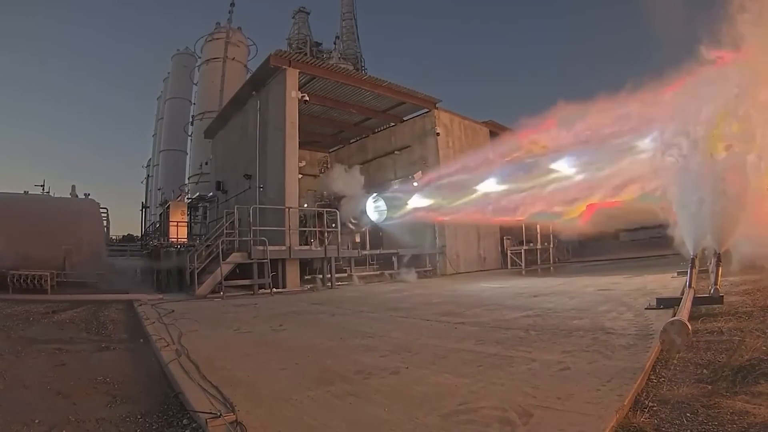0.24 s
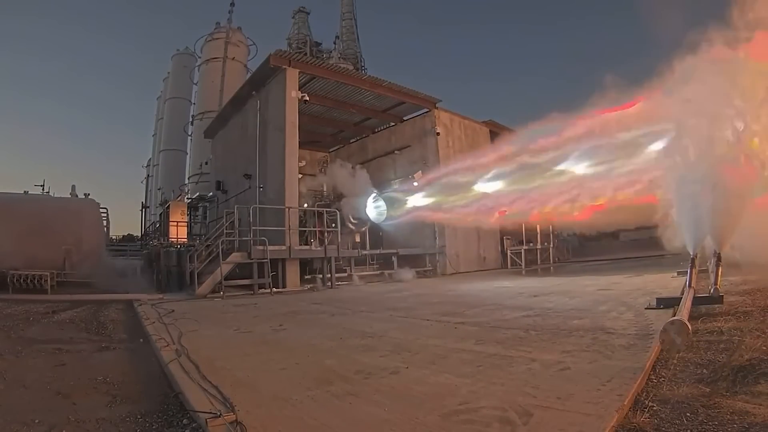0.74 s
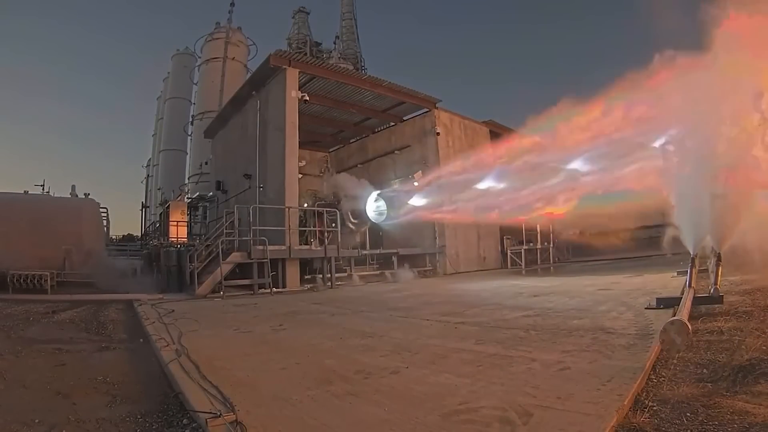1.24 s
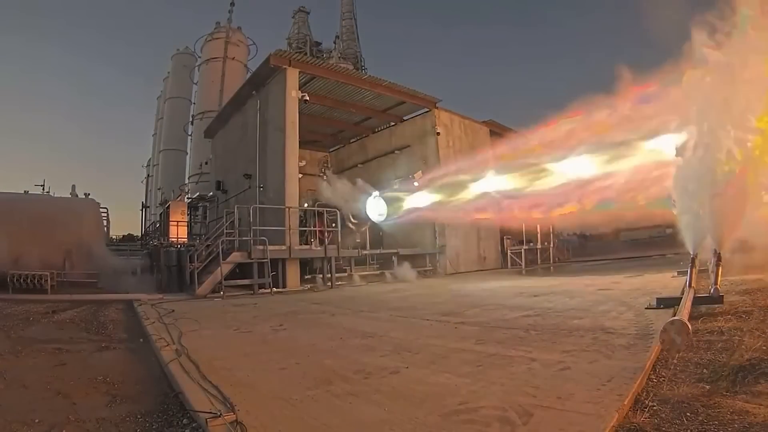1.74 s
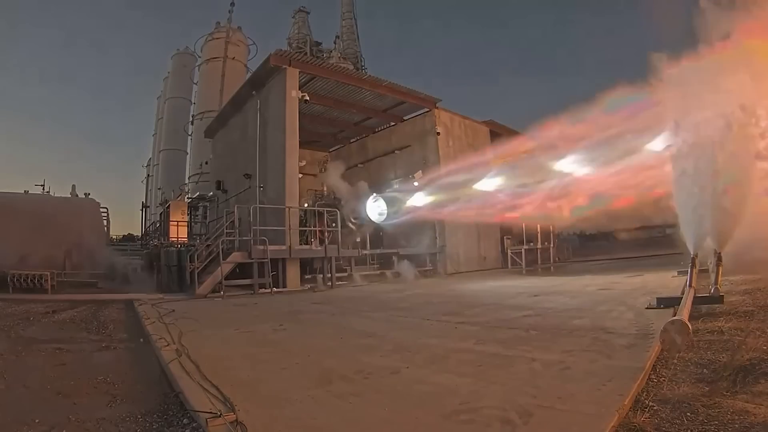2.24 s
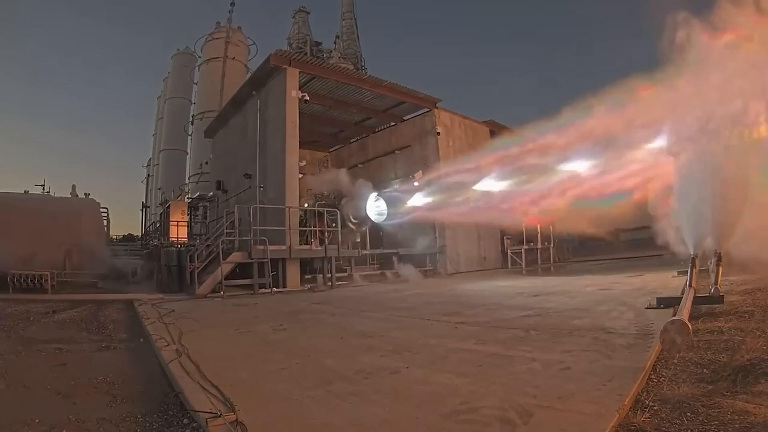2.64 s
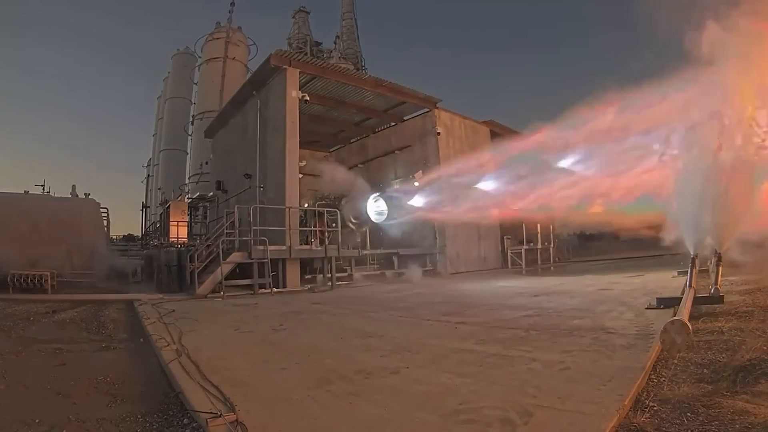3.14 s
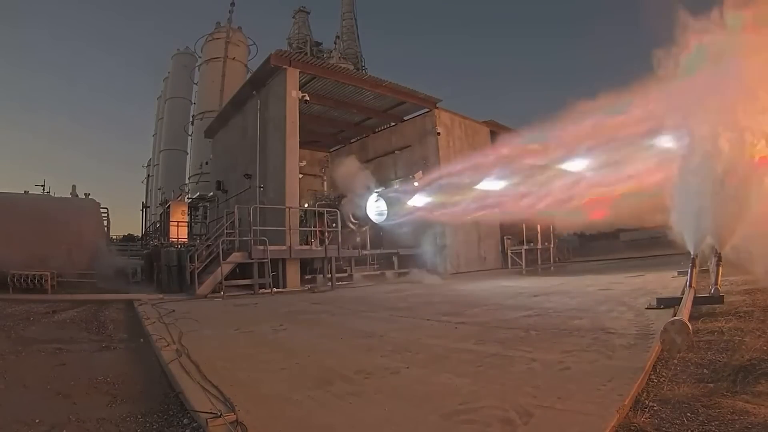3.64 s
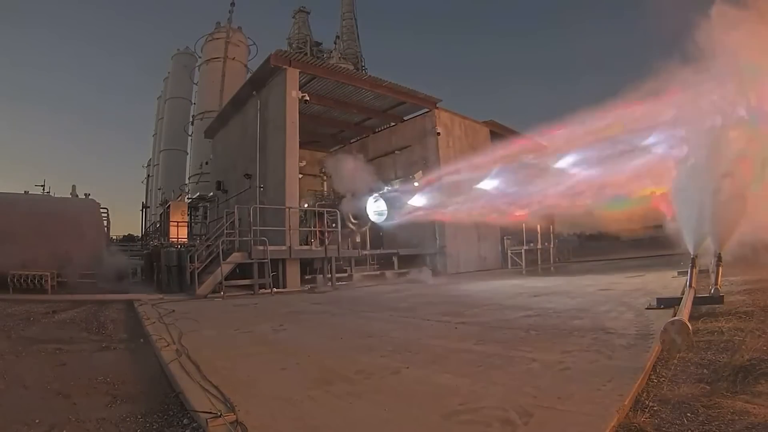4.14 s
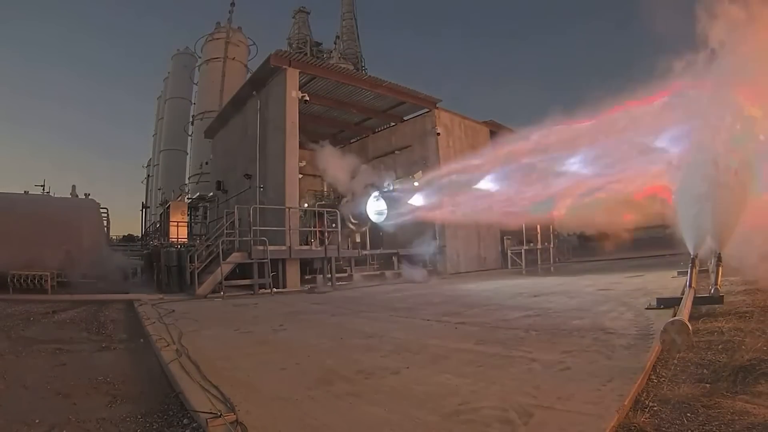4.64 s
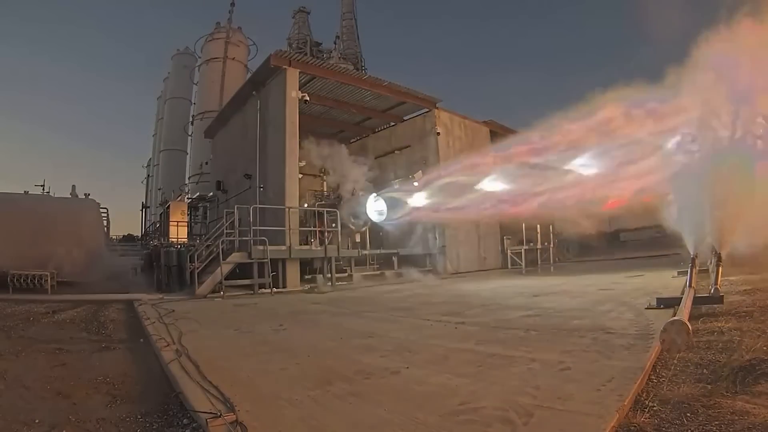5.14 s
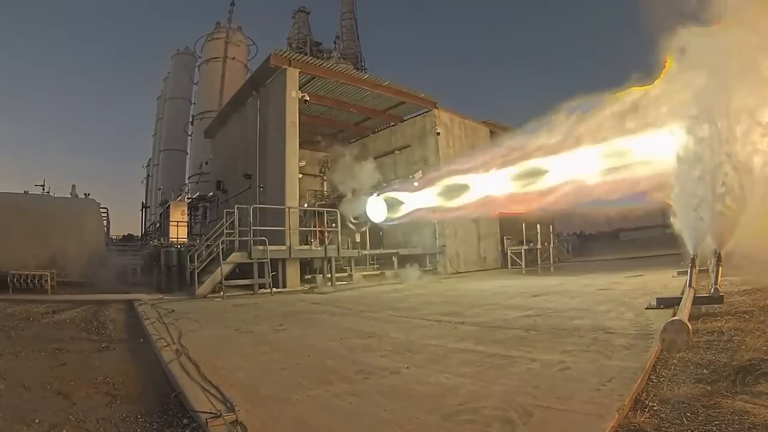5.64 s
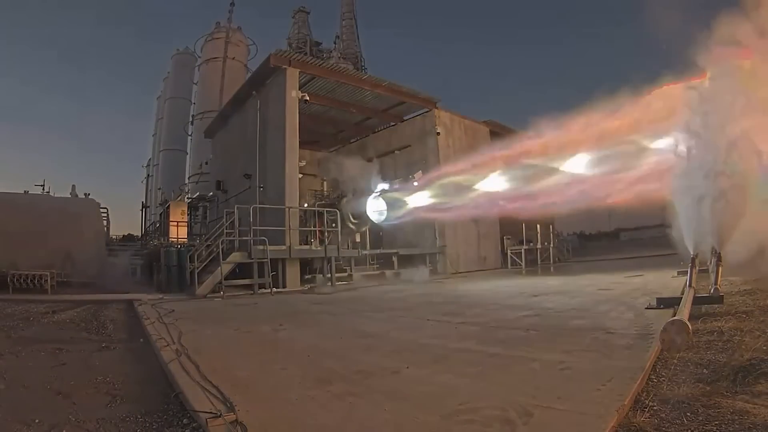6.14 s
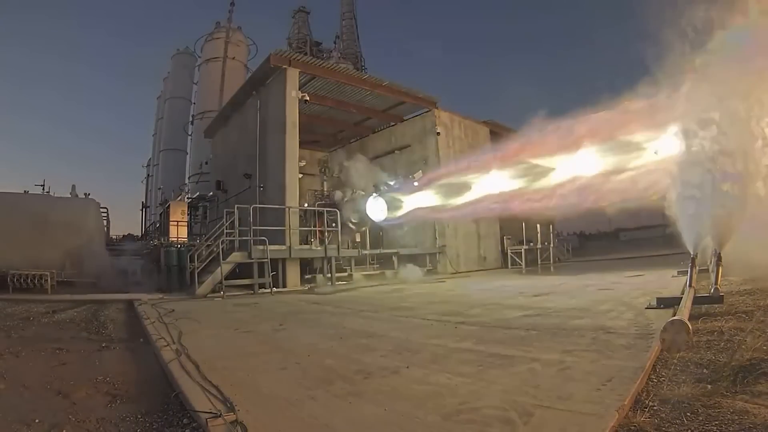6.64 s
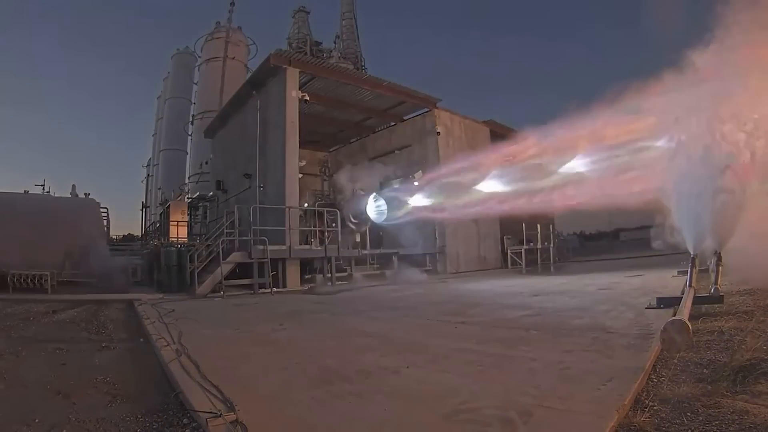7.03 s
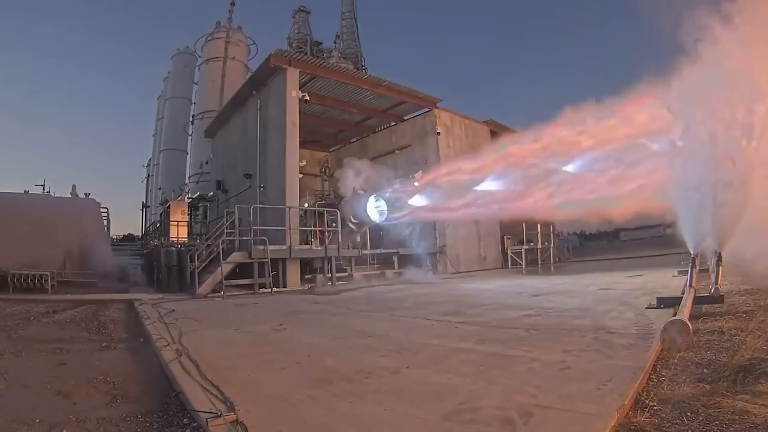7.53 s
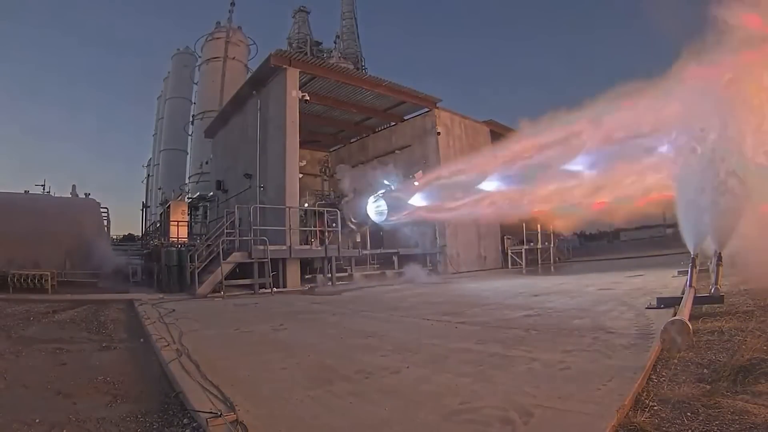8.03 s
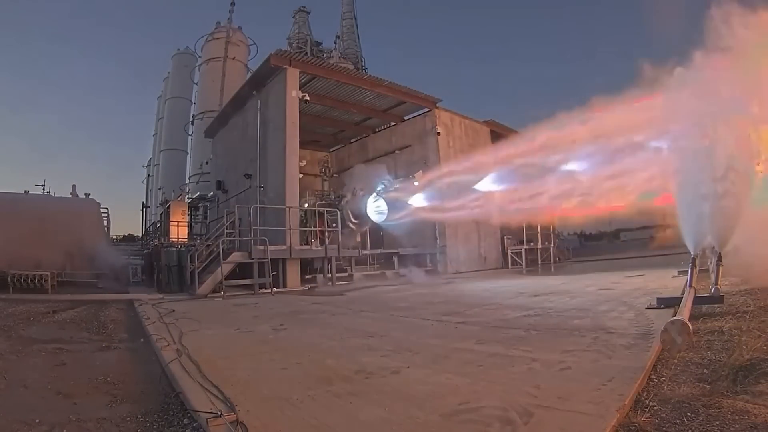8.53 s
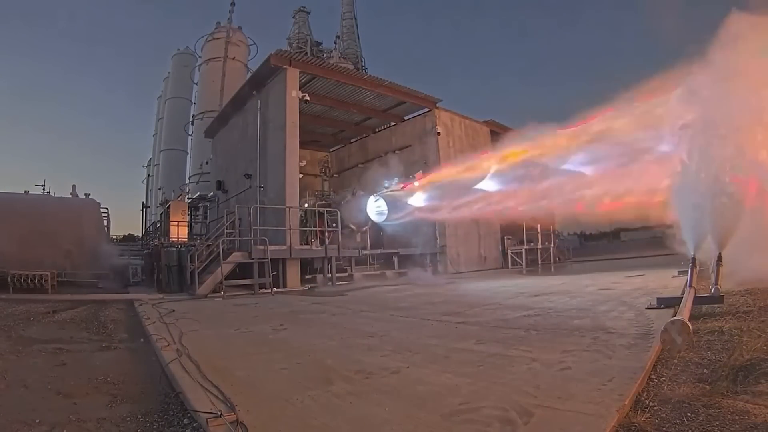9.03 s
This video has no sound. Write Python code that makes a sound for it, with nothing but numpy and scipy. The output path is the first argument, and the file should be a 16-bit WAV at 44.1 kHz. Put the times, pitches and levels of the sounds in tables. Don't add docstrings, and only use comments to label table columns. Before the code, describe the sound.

A rocket engine on an outdoor test stand fires continuously, a very loud deep roar with heavy rumble and dense, sharp, irregular crackling throughout.

```python
import sys
import numpy as np
from scipy import signal
from scipy.fft import rfft, irfft
from scipy.io import wavfile
from scipy.ndimage import uniform_filter1d

SR = 44100
rng = np.random.default_rng(int(sys.argv[2]) if len(sys.argv) > 2 else 0)


def volts_from_db(level):
    exponent = np.asarray(level, float) / 20
    return 10 ** exponent


def unload_audio(sound):
    columns = np.transpose(np.atleast_2d(sound))
    steps = np.round(np.clip(columns, -1, 1) * 32767)
    wavfile.write(sys.argv[1], SR, steps.astype(np.int16))


N = 409248

# time in seconds, change in dB, half width in seconds.
SURGES = [(.01, 3, .03), (.2, 4, 0.088), (.85, -6, 0.09644), (1.06, 2, .06), (3.69, -5, .04),
          (3.77, 3, .03), (3.93, 1.5, .08), (4.47, -5, .04), (4.63, 2.5, 0.056), (4.73, -4, .04),
          (4.85, 3, .04), (4.91, -5, 0.02892), (5.25, 2, 0.075), (5.89, 2.5, .07), (6.1, -3.5, .07),
          (6.35, -5, .06), (6.97, -3, 0.065), (7.19, -2, 0.054), (7.39, 2, .06), (7.49, -10.5, .04)]
# delay in ms, ring level in dB, front level in dB.
DIRECT = [
    (0, 1, -0.5),
    (1.15, -1.5, -10.5),
]
# delay in ms, ring level in dB, front level in dB.
GROUND = [
    (4.45, -2, 0),
    (5.7, -5, -14),
    (9.1, -9.5, -20),
    (14.5, -11, -21),
]


def evened(x):
    return x / np.sqrt(np.mean(x ** 2) + 1e-20)


def read(points, hz):
    f, value = np.transpose(points)
    return np.interp(np.log(hz + 1), np.log(f + 1), value)


def shaped(x, db_of_hz):
    return irfft(rfft(x) * volts_from_db(db_of_hz(np.fft.rfftfreq(N, 1 / SR))), N)


def wander(hz):
    return evened(signal.lfilter(*signal.butter(2, hz, fs=SR), rng.standard_normal(N)))


def bumps(rows):
    t = np.arange(0, N + 64, 64) / SR
    bells = sum(db * np.exp(-((t - s) / width) ** 2) for s, db, width in rows)
    return np.interp(np.arange(N) / SR, t, bells)


def plume(column):
    # time in seconds, crackle activity in dB, lean of small fronts to the direct path in dB.
    plume_rows = np.array([(0, -57, -1.5), (.2, -52, 0), (.6, -55, 1), (.78, -63.5, -2), (1.05, -54, 0),
                           (1.6, -56.5, -4), (2.2, -52.5, -4), (3.3, -54, -5), (3.65, -58, -5),
                           (3.8, -53, -5), (4.25, -52, -6), (4.45, -56, -6), (5.4, -55.5, -6.5),
                           (5.85, -51, -4), (6.05, -54.5, -3), (7.5, -58.5, 3), (8.2, -54, -0.5),
                           (9.28, -58, -3)])
    return np.interp(np.arange(N) / SR, plume_rows[:, 0], plume_rows[:, column])


def rumble(level_db=-11.5, steadiness=0.43):
    # frequency in Hz, strength in dB per Hz.
    rumble_colour = [(14, -35), (24, -11), (43, -1.6158), (65, -1.5), (80, -1), (110, -14), (130, -12.5),
                     (170, -42), (290, -120)]
    deep = evened(shaped(rng.standard_normal(N), lambda hz: read(rumble_colour, hz)))
    swell = uniform_filter1d(np.abs(signal.hilbert(deep)), size=1500) + 0.1
    deep = evened(shaped(deep / swell ** steadiness, lambda hz: -10 * np.log10(1 + (hz / 100) ** 6)))
    deep = volts_from_db(level_db + bumps(SURGES)) * deep
    return np.array([deep, np.roll(deep, SR // 8)])


def turbulence(spectrum, level_db, flicker_db, flicker_hz):
    noise = [evened(shaped(rng.standard_normal(N), lambda hz: read(spectrum, hz))) for _ in range(2)]
    return np.array(noise) * volts_from_db(level_db + flicker_db * wander(flicker_hz))


def body():
    # frequency in Hz, strength in dB per Hz.
    body_colour = [(65, -36), (110, -2), (151, -3), (204, 0), (298, -1), (388, -13), (420, -15), (550, -40),
                   (920, -120)]
    # time in seconds, change in dB, half width in seconds.
    body_swells = [
        (3.7, 1, 0.0794),
        (5.0, -2, .13),
        (6.26, 2, 0.13),
        (7.68, -3, .13),
        (8.35, -1, .15),
        (.1, -1, 0.081),
        (5.95, -2.5, 0.091),
        (8.15, 1.5, 0.089),
    ]
    level_db = -18.5 + 0.2 * bumps(SURGES) + bumps(body_swells)
    return turbulence(body_colour, level_db, flicker_db=1.5, flicker_hz=25)


def roar_db():
    calm_db = -55.5
    return -23 + 0.18 * (plume(column=1) - calm_db)


def roar():
    # frequency in Hz, strength in dB per Hz.
    roar_colour = [(240, -32), (400, -8.5), (537, -4), (630, -2.5), (776, -1), (930, -1.5), (1090, -11.5),
                   (1300, -10.5), (1560, -14), (3590, -29), (5800, -51), (7500, -47.5), (9750, -62),
                   (12200, -66), (16500, -120)]
    return turbulence(roar_colour, roar_db(), flicker_db=1.52, flicker_hz=50)


def front(edge_hz=6000):
    # frequency in Hz, level in dB.
    front_colour = [(700, -16), (1400, 1.5), (2200, 2.5), (4200, -2), (6000, -14), (7000, -6), (9000, -5),
                    (10200, -5), (11300, -9), (12300, -21), (13300, -47), (15000, -59)]
    hz = np.abs(np.fft.fftfreq(4096, 1 / SR))
    log_gain = np.log(volts_from_db(np.maximum(read(front_colour, hz), -70)))
    whole = np.exp(log_gain - 1j * np.imag(signal.hilbert(log_gain)))
    jump = np.fft.ifft(whole).real[:2048]
    edge = signal.lfilter(*signal.butter(6, edge_hz, "high", fs=SR), jump)
    low = signal.lfilter(*signal.butter(6, edge_hz, fs=SR), jump)
    return np.array([low, -edge]) / np.abs(jump).max()


def ring(hz, db, t60, delay_ms=0, rise_ms=0.076414):
    t = np.maximum(np.arange(2048) / SR - delay_ms / 1000, 0)
    rise = 1 - np.exp(-(t * 1000 / rise_ms) ** 2)
    return volts_from_db(db - 60 * t / t60) * np.sin(2 * np.pi * hz * t) * rise


def housing():
    # frequency in Hz, level in dB, t60 in seconds.
    modes = [
        (885, -1, .008),
        (685.77, -7, 0.007046),
        (1560, -7, .007),
        (2090, -14.5, 0.0022),
    ]
    return sum(ring(*mode) for mode in modes)


def ground_thump():
    # frequency in Hz, level in dB, t60 in seconds, delay in ms.
    bounce = (250, -4, 0.0008, 3)
    return ring(*bounce)


def stand_tail(clicks, t60):
    r = np.exp(-2 * np.log(1000) / (t60 * SR))
    power = signal.lfilter([1 - r], [1, -r], clicks ** 2)
    return np.sqrt(power) * rng.standard_normal(size=(2, N))


def add_knocks(rings, lag):
    # time in seconds, ring level in dB.
    knocks = [(0.0589, -12.5), (0.1828, -9.5), (0.2096, -4), (0.2759, -6.5), (0.3083, -9), (0.3506, -12.5),
              (0.5764, -11.5), (0.596, -8), (1.006, -12), (1.0195, -10), (1.0579, -12), (1.5294, -9),
              (1.6642, -13), (1.817, -9), (1.8708, -8), (1.9275, -10), (1.9373, -11), (2.2335, -9),
              (2.304, -13), (2.3865, -5), (2.4072, -11), (2.6118, -10), (3.0335, -11.5), (3.2278, -10),
              (3.3274, -6), (3.401, -10.5), (3.4576, -9), (3.4877, -14), (3.5036, -10), (3.7198, -10),
              (3.9025, -8), (3.9194, -8), (3.9886, -8), (4.0239, -10), (4.1864, -10), (4.2075, -8),
              (4.2179, -5), (4.2358, -9), (4.2759, -9), (4.3104, -12), (4.416, -10.5), (4.4445, -10),
              (4.5326, -11), (4.6805, -8), (4.7085, -10), (4.9912, -9), (5.0336, -8), (5.2403, -8),
              (5.269, -10), (5.4659, -10.5), (5.4757, -7.5), (5.5735, -10), (5.7641, -9), (6.2906, -9),
              (6.4278, -10.5), (6.503, -6), (6.5383, -7), (6.6809, -14), (6.8475, -8), (7.3562, -7)]
    s, db = np.transpose(knocks)
    at = np.round(s * SR).astype(int)
    rings[at] = volts_from_db(db)
    rings[at + lag] = volts_from_db(db - 5.5)


def lone_shocks():
    # time in seconds, body level in dB, edge
    # level in dB.
    lone_clicks = [(0.0718, -30, -44.0), (0.1052, -29.5, -47.5), (0.1498, -31.0, -33.0), (0.1854, -27.0, -33.0),
                   (0.1982, -22, -35.0), (0.203, -48, -36.5), (0.2229, -27, -41.5), (0.275, -30.0, -37.0),
                   (0.282, -28.5, -41.0), (0.2983, -32, -40.0), (0.3497, -28.0, -37), (0.3802, -25.5, -29),
                   (0.4062, -32.0, -42.0), (0.4329, -34, -38.5), (0.44, -27, -34), (0.5637, -31, -36.5),
                   (0.5755, -35.0, -39.0), (0.5873, -34.0, -37.0), (0.6075, -31, -33.0), (0.6764, -33, -43.0),
                   (0.8213, -29.0, -37), (1.0066, -41.0, -38.0), (1.2349, -29.5, -40.0), (1.339, -32, -37.0),
                   (1.4989, -28.5, -34.0), (1.5035, -36.0, -39.0), (1.5457, -37, -40.0), (1.7621, -32, -36.0),
                   (1.7876, -51.0, -32.5), (1.8426, -32.0, -41.0), (1.8715, -36, -40.0), (1.875, -32.0, -37.5),
                   (1.9287, -34.0, -37), (1.932, -27.5, -38.0), (1.9565, -31, -37), (2.007, -33.0, -41.5),
                   (2.0296, -29, -35.0), (2.0326, -31, -30), (2.071, -30, -38.0), (2.0745, -30.0, -32.5),
                   (2.1064, -31.0, -37.0), (2.1498, -32.0, -36), (2.1699, -25.5, -31.0), (2.2236, -29, -29),
                   (2.2306, -28.0, -30), (2.2342, -30.0, -34.5), (2.3613, -24.0, -27), (2.3715, -46.0, -33.0),
                   (2.3878, -27.0, -34.0), (2.4117, -33.0, -31.5), (2.4545, -30, -29), (2.5307, -34.5, -37.0),
                   (2.5462, -27, -33.0), (2.5546, -36.0, -42.0), (2.5814, -20, -34.5), (2.5856, -29.0, -33.0),
                   (2.6674, -31.0, -33.0), (2.6778, -32.0, -43.0), (2.741, -31.0, -33.5), (2.8158, -35, -31),
                   (2.8228, -29, -32), (2.8712, -34.5, -39.0), (2.8757, -32.0, -28), (3.0369, -31.5, -38.0),
              (3.1201, -36, -37), (3.1243, -31.5, -30), (3.1314, -28.0, -30.5), (3.2171, -27, -43.0),
              (3.2218, -36.0, -32.0), (3.2328, -32.0, -39.0), (3.3122, -37, -36), (3.3294, -29, -38.0),
              (3.3327, -24, -30.0), (3.401, -32.5, -45.0), (3.4139, -33.0, -39.0), (3.4484, -33, -29.0),
              (3.5037, -32, -39.0), (3.5082, -31.0, -43), (3.5621, -31, -31.0), (3.7114, -33, -39),
              (3.7199, -31, -44.0), (3.7474, -32.5, -33.0), (3.7736, -26.0, -31.0), (3.778, -24, -31),
              (3.787, -33.0, -29.0), (3.8241, -31.0, -44.0), (3.9023, -31.5, -31.0), (3.9072, -29, -30.5),
              (3.9242, -31.0, -35.0), (3.9718, -34, -36.0), (3.9764, -33.0, -35), (3.9933, -33.0, -33),
              (4.014, -32.0, -46.0), (4.0176, -31.0, -35), (4.024, -33.5, -38), (4.0723, -24, -37.0),
              (4.0768, -29.0, -29), (4.088, -30, -40.0), (4.119, -30, -34), (4.1548, -31, -33.0),
              (4.1871, -31.0, -32.5), (4.1919, -33.0, -28.0), (4.209, -33, -35), (4.219, -32.0, -35.0),
              (4.2367, -31.0, -32.5), (4.2411, -29.0, -32.0), (4.2772, -29, -35), (4.3115, -35.0, -41.0),
              (4.3153, -31.5, -35.5), (4.3418, -35, -44), (4.4126, -34.5, -35.0), (4.4463, -29.0, -36.0),
              (4.5927, -36, -38), (4.6723, -26, -35.0), (4.6771, -29.0, -33.0), (4.686, -25.0, -27.0),
              (4.7407, -27.5, -36.0), (4.9406, -28, -33.0), (4.977, -34, -31.5), (4.9957, -32, -30.0),
                   (5.1365, -30.5, -32.5), (5.1668, -31.0, -33.5), (5.2728, -32, -32.0), (5.3288, -36.0, -46.0),
            (5.541, -29.0, -37.0), (5.6054, -29.5, -27.0), (5.6573, -38.0, -43.0), (5.6906, -35.0, -48.0),
            (5.7913, -32, -40.0), (5.796, -26.5, -30), (5.9152, -30, -37.0), (6.1458, -33.0, -41.0),
            (6.171, -30.0, -34.0), (6.1746, -27.0, -30.0), (6.29, -31.0, -40.0), (6.2945, -36.0, -35.0),
            (6.3108, -29, -37), (6.4049, -29, -40.0), (6.4087, -31.5, -34), (6.5755, -33.0, -34),
            (6.5798, -35.0, -34.0), (6.7156, -33.0, -39.0), (6.756, -37.0, -40.0), (6.7839, -30, -38),
            (6.9235, -38.0, -31.5), (7.139, -29.0, -38.0), (7.1427, -33.0, -29), (7.168, -31.0, -25.0),
            (7.2717, -34.0, -34.0), (7.3097, -35.0, -33.5), (7.3479, -30.0, -36.0), (7.3569, -29.0, -39.0),
            (7.3611, -30.5, -33.0), (7.4338, -39.0, -40), (7.4378, -33.5, -35.5), (7.5772, -29.5, -30),
            (7.6485, -31, -36.0), (7.6526, -28, -32.5), (7.7924, -34, -36.0), (7.8, -31, -37.5),
            (7.805, -32, -32), (7.9404, -26.0, -42.0), (7.945, -32.0, -33.0), (8.0399, -50.0, -32.0),
            (8.1962, -31.0, -33), (8.225, -46.0, -33), (8.2527, -27, -35), (8.258, -31.5, -28),
            (8.367, -27, -35), (8.4626, -27, -37), (8.568, -35, -37), (8.6064, -38.0, -40.0),
            (8.611, -29.0, -34.0), (8.6413, -33, -41.0), (8.7173, -33.0, -32.0), (8.79, -26.0, -27.5),
            (8.8338, -30, -33), (9.0206, -29, -40.0), (9.026, -32, -33), (9.223, -29, -33.0),
                   (0.7865, -33.0, -41), (0.8616, -36.0, -46.0), (0.8945, -34.0, -47.0), (0.9368, -31.0, -45.0),
             (1.0989, -30, -41.0), (1.1948, -34.0, -42.0), (1.2071, -33.0, -41.0), (1.5422, -32, -41.0),
             (1.6103, -40.0, -45.0), (1.6138, -36.0, -39.0), (1.6214, -36.0, -41.0), (1.8469, -34, -37.0),
             (1.9051, -36, -43.0), (2.0812, -34, -36.0), (2.5652, -32, -39.0), (2.91, -36.5, -38.0),
             (2.9149, -31.0, -39.0), (3.0406, -36.0, -40.0), (3.2646, -31, -39.0), (3.4737, -35, -50.0),
             (3.7429, -35.0, -43.0), (3.955, -36.0, -39), (4.1255, -29, -37.0), (4.268, -22.0, -23.0),
             (4.385, -31, -33.0), (4.4036, -38.0, -42.0), (4.504, -35.0, -44.0), (4.5076, -35.0, -40.0),
             (4.5766, -28.0, -30), (4.6024, -33.0, -34), (4.895, -35.0, -44.0), (5.0483, -38.0, -48.0),
             (5.1637, -31.0, -41.0), (5.432, -38.0, -46.0), (5.5475, -31, -37.0), (6.0041, -39.0, -63.0),
             (6.1506, -32.0, -36.0), (6.2786, -36.0, -40.0), (6.3782, -33.0, -42.0), (6.4162, -40.0, -44.0),
             (6.5225, -38.0, -39), (6.6237, -33.0, -62.0), (6.7744, -35.0, -56.0), (7.0044, -36.0, -36.0),
             (7.0984, -35, -38.0), (7.1715, -36.0, -39), (7.2672, -35.0, -41.0), (7.6239, -41.0, -39.0),
             (8.1402, -32.0, -39), (8.8111, -46.0, -42), (8.8729, -36.0, -39), (8.945, -33.0, -38.0),
             (8.9807, -46.0, -35), (9.0602, -31, -53.0), (9.2536, -46.0, -44.0)]
    rings, fronts = np.zeros(N + SR), np.zeros((2, N + SR))
    lag = round(GROUND[0][0] / 1000 * SR)
    s, *db = np.transpose(lone_clicks)
    at, db = np.round(s * SR).astype(int), np.array(db)
    bright = db[1] > db[0] - 2
    first = at - lag * bright
    fronts[:, at - lag] = volts_from_db(db - 19)
    rings[first] = volts_from_db(db.max(0) + 13)
    fronts[:, at + round(DIRECT[1][0] / 1000 * SR)] = volts_from_db(db - 17)
    fronts[:, at] = volts_from_db(db - 1.5)
    add_knocks(rings, lag)
    return rings, fronts


def strong_shocks():
    # time in seconds, ring level in dB, front level in dB.
    sharp_late = [(2.1593, -3, -22.5), (2.3758, -5, -22), (2.4804, -10.5, -26), (2.6546, -9.5, -20),
                  (2.7599, -11.5, -23.5), (2.8983, -9, -21), (2.9646, -9, -25), (3.0218, -6, -25),
                  (3.1861, -12, -27), (3.3195, -10.5, -24), (3.762, -8.5, -21), (3.814, -6.5, -21),
                  (3.8728, -6.5, -22), (3.8915, -12, -27), (3.9548, -12, -28), (4.0447, -9, -20),
                  (4.175, -6.5, -25), (4.2666, -5.5, -19), (4.3837, -9, -28), (4.5577, -12.5, -27),
                  (4.607, -7.5, -27), (4.7181, -7.5, -27), (4.803, -8, -21), (4.8159, -6, -22),
                  (5.2015, -10, -25), (5.212, -8, -27), (5.2554, -9.5, -23.5), (5.3182, -8.5, -22),
                  (5.6447, -9.5, -28.5), (5.8615, -13, -31), (5.9254, -7, -24)]
    # time in seconds, ring level in dB, front level in dB.
    sharp_first = [(.1281, -18, -32.5), (0.172, -7.5, -23.5), (.3684, -13.5, -26.5), (0.4791, -15, -19),
                   (0.499, -12, -30), (.9036, -15, -28), (.9799, -6.5, -22.5), (.9946, -13, -27),
                   (1.0583, -11, -28), (1.0873, -7.5, -33), (1.1837, -9, -34), (1.4324, -5.5, -22.5),
                   (1.7122, -10, -29), (2.0522, -14.5, -27), (2.2798, -7.5, -28.5), (2.2912, -12, -22),
                   (2.3504, -6.5, -30), (4.5718, -9, -34), (5.732, -6.5, -24), (6.2075, -9.5, -34),
                   (6.7049, -9, -31.5), (6.8174, -10, -26), (7.0462, -10.5, -28), (7.1633, -15, -27),
                   (7.6148, -17, -26.5), (8.087, -15, -27.5), (8.2022, -7.5, -23.5), (8.3952, -11.5, -29.5),
                   (8.633, -13, -23.5), (8.7857, -15, -32), (7.881, -17, -29), (8.0935, -18, -29.5)]
    # time in seconds, ring level in dB.
    mostly_ring = [(0.5755, -14), (.8214, -14.5), (1.2348, -13), (2.2192, -11.5), (2.4508, -11),
                   (2.5288, -9), (2.5812, -12), (2.7361, -14), (2.8111, -10), (2.8711, -15.5), (2.953, -13),
                   (3.1199, -14), (3.217, -11), (3.4438, -10.5), (3.7111, -11), (4.114, -13), (4.6723, -10),
                   (4.9722, -11.5), (5.1322, -10.5), (5.5366, -10.5), (5.631, -10.5), (5.888, -7),
                   (6.1225, -11.5), (6.1708, -12.5), (6.4041, -13), (6.5755, -11.5), (7.5724, -12.5),
                   (7.7993, -12), (7.94, -15)]
    late_s, late_ring, late_front = np.transpose(sharp_late)
    first_s, first_ring, first_front = np.transpose(sharp_first)
    s, ring_db = np.transpose(mostly_ring)
    return np.concatenate([[late_s, late_ring, late_front - 19, late_front],
                           [first_s, first_ring, first_front, first_front - 5],
                           [s, ring_db, ring_db - 29.5, ring_db - 26.5]], axis=1)


def small_shocks(strong_s, per_s=320, spread_db=4.5, largest=3.1233, blunt_db=6.5):
    small = np.flatnonzero(rng.random(N) < per_s / SR)
    clumps = bumps([(s, 0.64, 0.032) for s in strong_s])
    chance = np.minimum(rng.exponential(1, len(small)), largest)
    size_db = spread_db * (chance - 2) + (1.4 * wander(25) + clumps)[small]
    sharp_db = size_db + plume(column=1)[small] + 4
    blunt = blunt_db * np.minimum(rng.standard_normal((2, len(small))), 0.8)
    ring_db = size_db + roar_db()[small] - 1.2443
    return small, [ring_db, sharp_db + blunt[0] + plume(column=2)[small], sharp_db + blunt[1]]


def crackle(front_db=13, ring_db=0.7, tail_db=-15, private_db=7):
    strong_s, *strong_db = strong_shocks()
    small, small_db = small_shocks(strong_s)
    at = np.concatenate([strong_s * SR, small])
    ring_size, *front_sizes = volts_from_db(np.concatenate([strong_db, small_db], axis=1))
    rings, fronts = lone_shocks()
    colours = (0.1, -4), (-5, 0.1)
    for paths, colour_db, front_size in zip((DIRECT, GROUND), colours, front_sizes):
        for ms, path_ring_db, path_front_db in paths:
            shift = 0.015 * rng.standard_normal(len(at))
            arrival = np.round(at + ms / 1000 * SR * (1 + shift)).astype(int)
            np.add.at(rings, arrival, ring_size * volts_from_db(path_ring_db))
            for train, db in zip(fronts, colour_db):
                np.add.at(train, arrival, front_size * volts_from_db(path_front_db + db))
    thump = np.zeros(N)
    np.add.at(thump, at.astype(int), ring_size)

    shared_only = np.array([[1], [0]])
    tail_gain = volts_from_db(tail_db) * volts_from_db([[0], [private_db]])
    sound = np.zeros((2, N))
    for train, shape in zip(fronts[:, :N], front()):
        train = train * shared_only + tail_gain * stand_tail(train, t60=0.049)
        sound += volts_from_db(front_db) * signal.oaconvolve(train, shape[None], axes=1)[:, :N]
    rings = rings[:N] * shared_only + tail_gain * stand_tail(rings[:N], t60=0.064)
    sound += volts_from_db(ring_db) * signal.oaconvolve(rings, housing()[None], axes=1)[:, :N]
    sound[0] += signal.oaconvolve(thump, ground_thump())[:N]
    return sound


def ports(shared, private):
    # frequency in Hz, likeness from 0 to 1.
    likeness = [(45, 0.999), (110, 0.98935), (200, 0.99), (360, 0.96), (650, 0.79), (1170, 0.88),
                (2120, 0.78), (3840, 0.74), (6960, 0.76), (9500, 0.85), (12600, 0.81)]
    # frequency in Hz, difference in dB.
    left_louder = [(60, -1.1), (110, -1.7), (200, -1.9), (360, -0.9), (650, -3), (1170, -1.2433),
                   (2120, -1.7), (3840, -2), (6960, -1), (12600, 0.5)]
    # frequency in Hz, phase lag of the right port in radians.
    phase_lag = [(40, .06), (250, 0), (520, -.4), (780, -.3), (1640, -.6), (2150, .1), (3190, .5),
                 (4910, .5), (5770, 0), (8870, -.1), (9650, -2.3), (10250, -3.1), (10700, -3.9),
                 (11600, -5.4), (12700, -5.7)]
    hz = np.fft.rfftfreq(N, 1 / SR)
    same = np.clip(read(likeness, hz), 0, 1)
    left = rfft(shared)
    right = same * left * np.exp(-1j * read(phase_lag, hz)) + np.sqrt(1 - same ** 2) * rfft(private)
    tilt = volts_from_db(read(left_louder, hz) / 2)
    return irfft(np.array([left * tilt, right / tilt]), N)


def scene():
    shared, private = rumble() + body() + roar() + crackle()
    return ports(shared, private)


def low_pass(x):
    return signal.sosfilt(signal.butter(12, 14900, fs=SR, output="sos"), x)


def record(dry):
    cut = signal.sosfilt(signal.butter(3, 39, "high", fs=SR, output="sos"), dry)
    power_db = 10 * np.log10(uniform_filter1d((cut ** 2).mean(0), size=900) + 1e-12)
    held = cut / volts_from_db(0.2 * np.maximum(power_db + 10, 0))
    ceiling = 1.0208
    soft = ceiling * np.tanh(held / ceiling)
    mix = signal.sosfiltfilt(signal.butter(6, 12800, fs=SR, output="sos"), soft)
    return low_pass(mix)


dry = scene()
out = record(dry)
unload_audio(out)
```